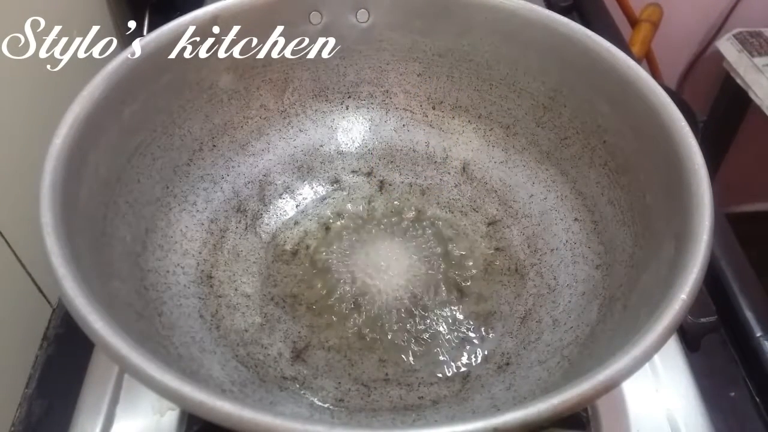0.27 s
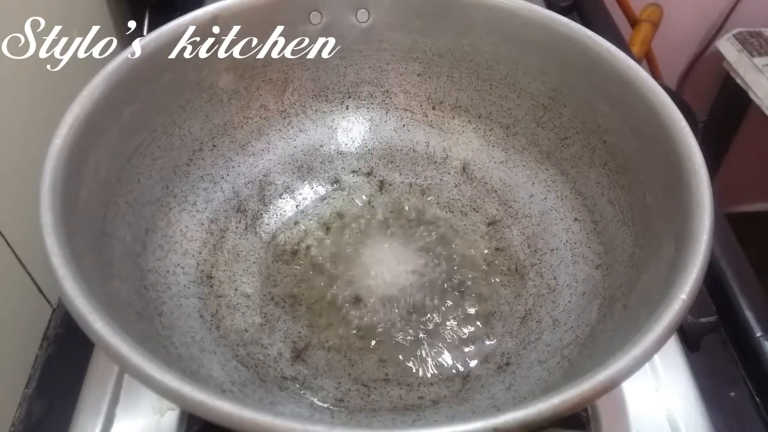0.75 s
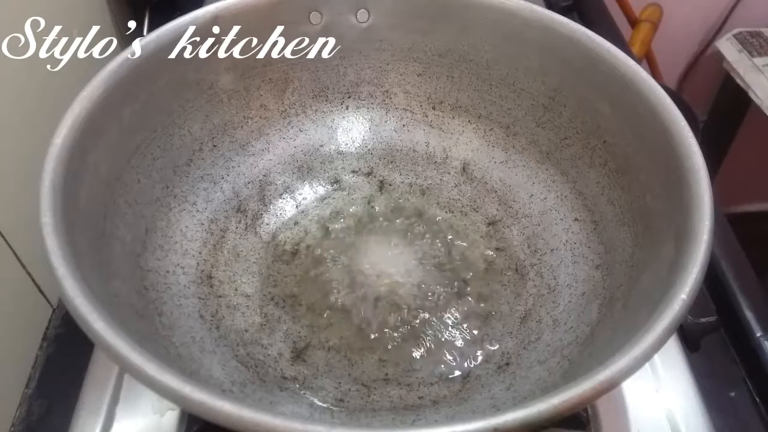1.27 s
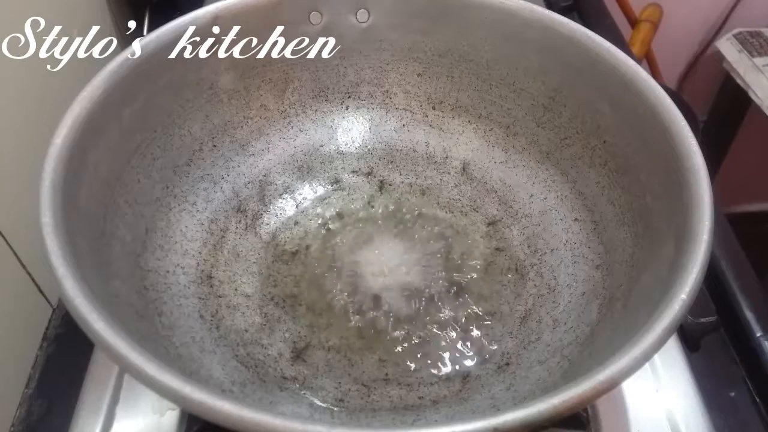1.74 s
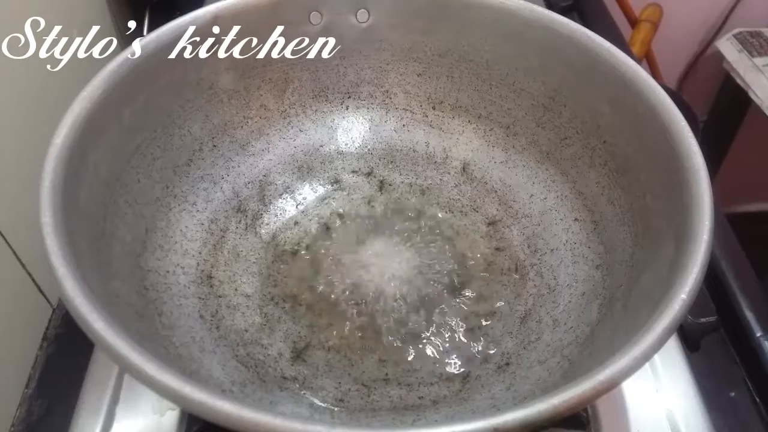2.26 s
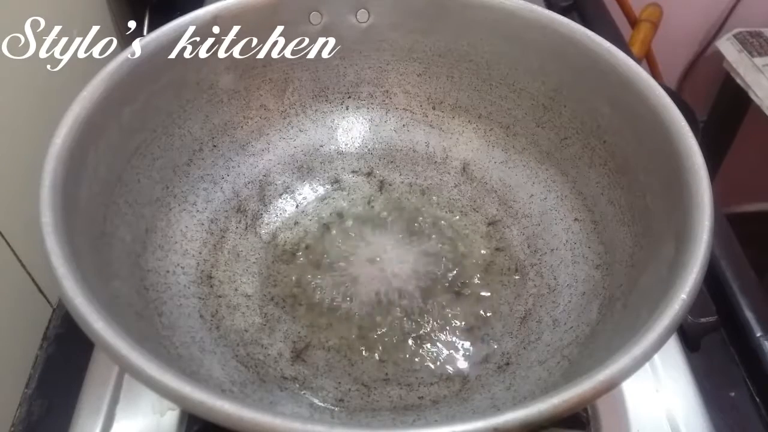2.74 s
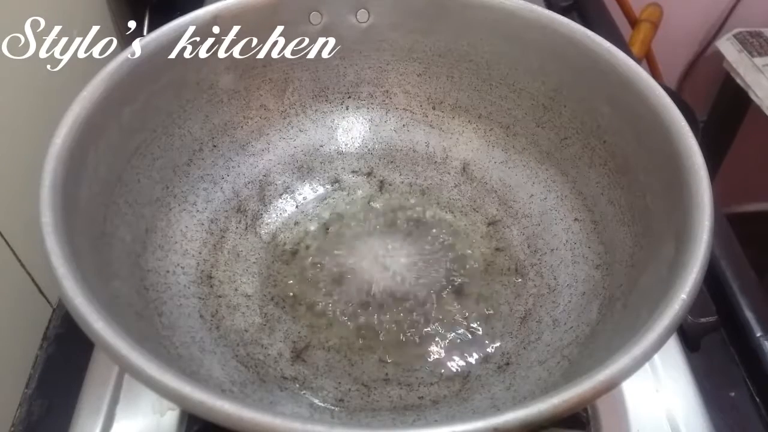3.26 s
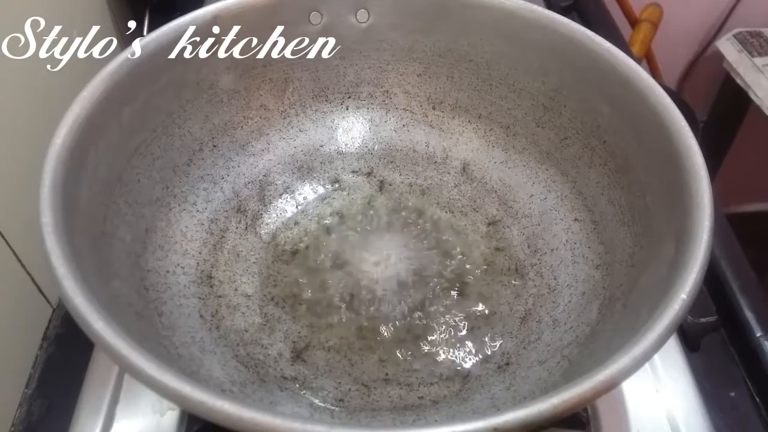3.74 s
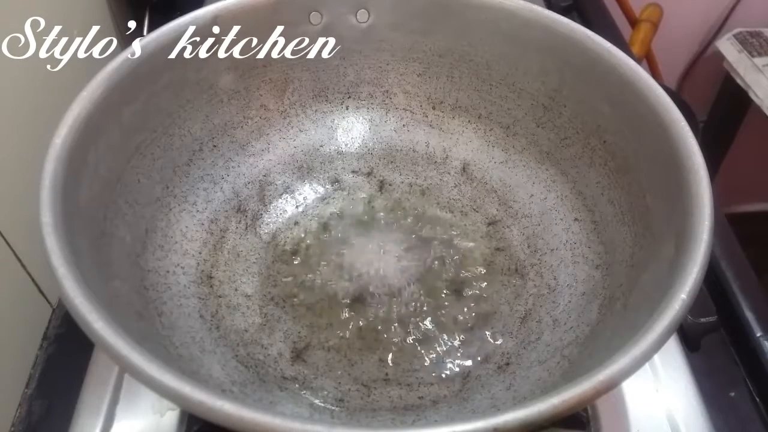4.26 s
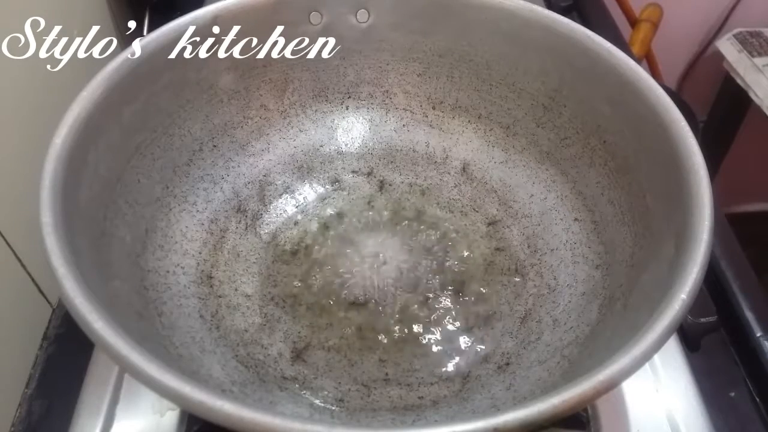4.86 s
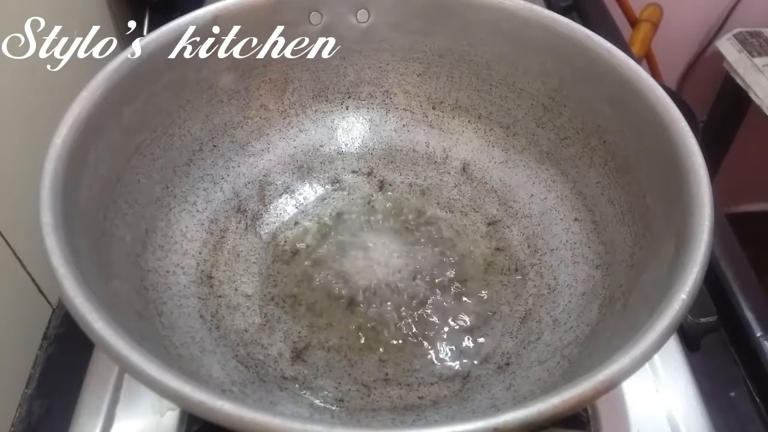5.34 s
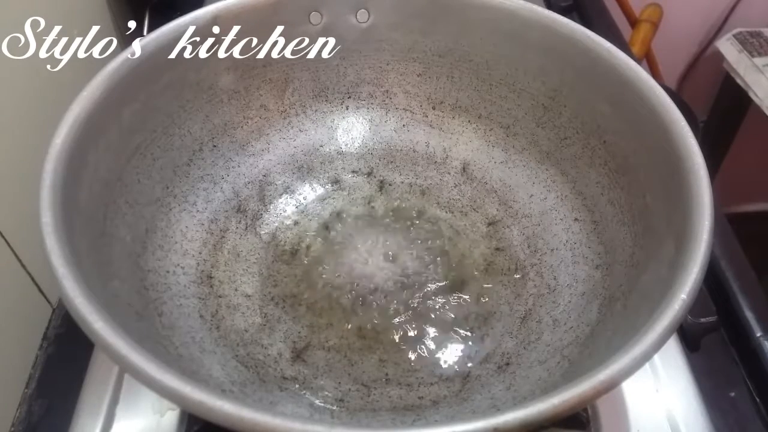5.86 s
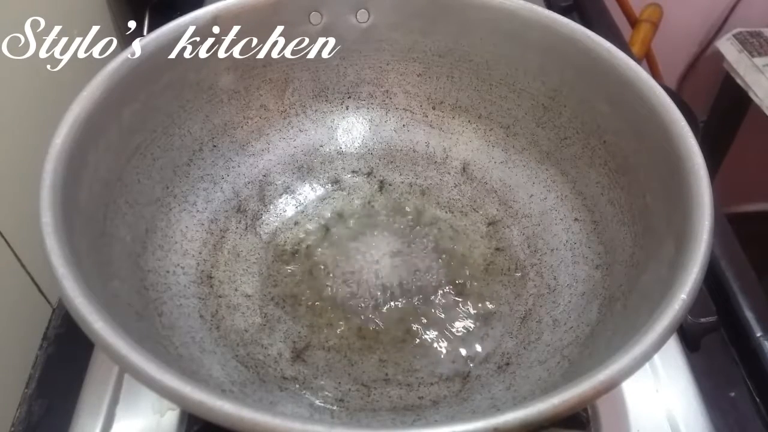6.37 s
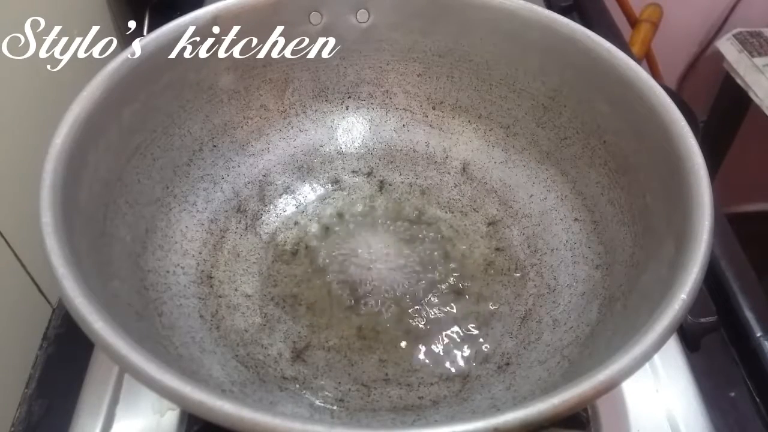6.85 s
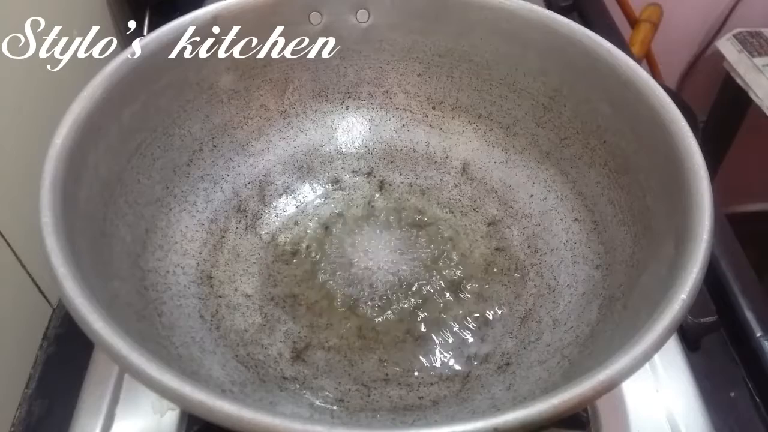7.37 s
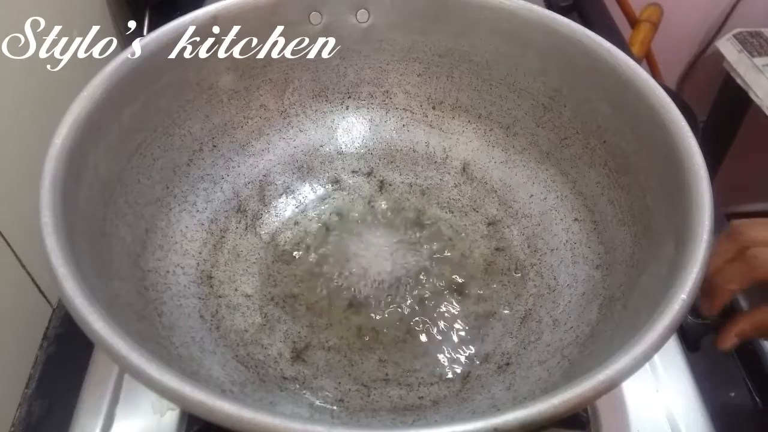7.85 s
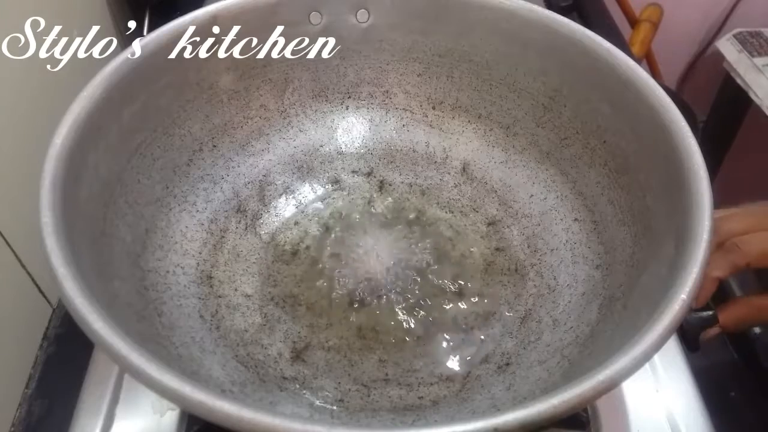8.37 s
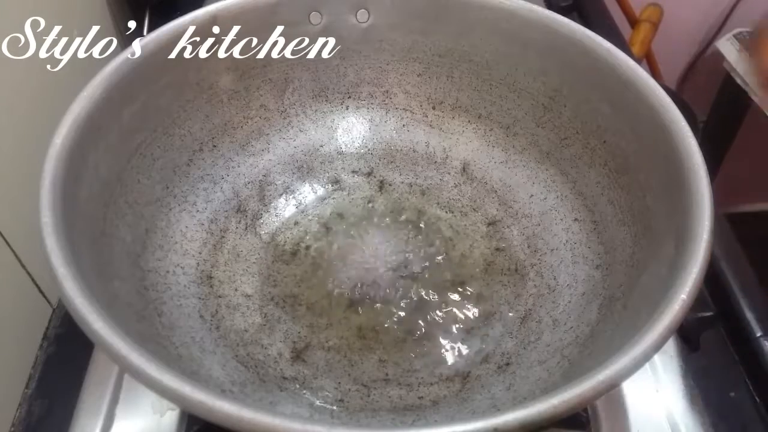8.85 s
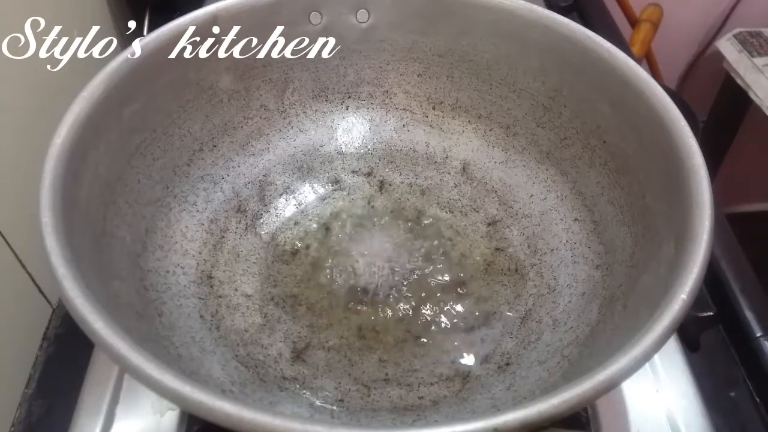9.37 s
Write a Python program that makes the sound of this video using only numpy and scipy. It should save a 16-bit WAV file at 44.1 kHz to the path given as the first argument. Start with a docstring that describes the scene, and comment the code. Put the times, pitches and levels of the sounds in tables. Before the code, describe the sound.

Close to a metal pan on a gas stove, hot oil hisses and seeds burst with sharp, snapping pops, loudest and most frequent in the first few seconds. The frying gradually dies down, with four late pops and some faint knocks. At the end only a quiet simmer and the soft rush of the flame remain in the small kitchen.

```python
"""Seeds fry in hot oil in a metal pan on a gas stove, heard close by in a small kitchen.
A seed bursts at once over the sizzle of countless tiny steam bubbles. The boil swells for 1.5 s, with
a few soft, dull knocks, and until about 4 s sharp pops rattle round the pan and ring in the room.
Then the moisture boils off and the sizzle fades; four late pops and some fainter knocks follow.
By 9 s only a faint simmer and the rush of the gas flame remain."""
import sys
import numpy as np
from scipy import signal
from scipy.fft import rfft, irfft
from scipy.io import wavfile
from scipy.ndimage import uniform_filter1d

SR = 44100
rng = np.random.default_rng(int(sys.argv[2]) if len(sys.argv) > 2 else 0)


def output_pcm(signal):
    """Save a mono or channel-first signal as 16-bit PCM at the path in sys.argv[1].

    Samples are clipped to [-1, 1] before scaling.
    """
    pcm = np.clip(np.atleast_2d(signal).T, -1, 1) * 32767
    wavfile.write(sys.argv[1], SR, np.round(pcm).astype(np.int16))


N = 423801

# Reverberation time of the kitchen: f/Hz, T60/s
KITCHEN_T60 = [(100, 0.42), (500, 0.41), (2000, 0.37), (4500, 0.36), (9000, 0.48), (16000, 0.1)]
# Resonances of the pan: f/Hz, nominal bandwidth/Hz, nominal lift/dB
PAN_MODES = [(1170, 210, 5), (1302, 18, 6.5), (1753, 27.6, 5.5), (1873, 13.4, 4.5), (2110, 30, 2),
             (2680, 61, 3), (2840, 52, -8), (3080, 47, -0.5), (3330, 22, 6.5), (3530, 27, 4.5),
             (3600, 36, 3.5), (3884, 92, 6.5), (4200, 150, 5.5), (4410, 300, 2), (4586, 60, 7),
             (5001, 40, -7.5), (5100, 57.3, 4.5), (8330, 600, 4), (12540, 1200, 3.5)]
# Spectral density of the gas flame: f/Hz, relative level/dB
FLAME_SPECTRUM = [(20, -29.5), (45, -24.5), (80, 1), (125, -8), (175, -2.5), (280, -6), (620, -12.5),
                  (1500, -14), (2700, -10), (4200, -11.5), (7500, -18.5), (16000, -23.5)]
# Dull knocks: t/s, level/dB, f/Hz, nominal width/octave, rise/s, decay/s
KNOCK_EVENTS = [(1.232, -37, 726, 0.27, 0.0019, 0.031), (1.32, -46.5, 780, 0.17, 0.004, .025),
                (1.515, -36, 646, 0.26, 0.001, 0.035), (5.211, -49, 815, 0.12, 0.032, 0.034),
                (5.232, -55.5, 1380, 0.063, 0.014, 0.053), (5.637, -48.5, 308, 0.22, 0.0027, 0.021),
                (7.95, -58.5, 320, 0.34, 0.0062, 0.06), (8.743, -57, 330, 0.48, 0.01, 0.054),
                (8.762, -58.5, 2630, 0.026, 0.012, 0.031), (8.794, -59, 410, 0.48, .008, 0.04)]
# Strength of the boil as the moisture runs out: t/s, level/dB
BOIL_LEVEL = [(0.0, -41.5), (0.72, -39.5), (0.97, -39.5), (1.12, -38.5), (1.55, -37.5), (1.9, -40),
              (2.6, -41.5), (3.3, -41), (3.85, -43.5), (4.6, -48.5), (5.4, -51), (6.35, -52.5),
              (6.85, -60.5), (7.35, -57.5), (7.75, -61.5), (8.55, -59.5), (9.0, -63), (9.6, -62.5)]
# Spectral density of the churning oil: f/Hz, relative level/dB
WASH_SPECTRUM = [(25, -3), (60, -5), (120, -0.5), (250, -3), (500, -4), (1000, -7.5), (2000, -12),
                 (4000, -16.5), (7000, -15.5), (8400, -13), (10000, -15), (12300, -12.5), (16000, -14)]
# Spectral density of the steam bubbles, before the pan's resonances: f/Hz, relative level/dB
BUBBLE_SPECTRUM = [(710, -54.5), (1200, -19), (1460, -21), (1750, -15.5), (1910, -20), (2200, -12),
                   (2830, -9), (3150, -3.5), (3430, -5.5), (4310, 1.5), (5350, -2), (7330, -18),
                   (9820, -25.5), (15200, -26.5), (16000, -13.5)]
# Basic spectral density of a pop: f/Hz, relative level/dB
POP_SPECTRUM = [(30, -16), (90, -18.5), (300, -11.5), (700, -5.5), (1200, -14), (2000, -8.5), (3000, -1.5),
                (4200, 0), (5300, -4), (7000, -19.5), (10000, -25.5), (16000, -31)]
# Bursting seeds: t/s, nominal peak level/dB, snap f/Hz, snap level re spatter/dB,
# thump lift/dB, body lift/dB, crack lift/dB, burst length/s
SEED_BURSTS = [(0.0005, -19, 4150, -3.5, -2, 5, 13.5, 0.0084),
               (0.5026, -30.5, 3070, -13, 6, -15, 22, 0.0055),
               (1.130, -33, 3280, -14, -5, 15.5, 11, 0.0043), (1.416, -8.5, 4244, 1.5, 17, 0, 4.5, 0.0032),
               (1.961, -3.5, 4280, -1, 7, -0.5, 3, 0.0035), (2.1955, -32.5, 3550, -14, 2, 8, 6.5, 0.0035),
               (2.442, -22, 4160, -11, 9, 7.5, 2, 0.0019), (2.7157, -9.5, 1815, -14, -3, 5, 8, 0.0054),
               (2.7282, -7, 4550, -5.5, 3, -9, 9, 0.002), (3.057, -30.5, 3500, -16, 2, 5.5, 13, 0.0055),
               (3.2221, -15.5, 3170, 1.5, 4, 7, -8.5, 0.0015), (3.309, -18.5, 2680, -4.5, -6, 7, 1, 0.0013),
               (3.9418, -23.5, 4200, -14, 9, 13, 9, 0.0045), (5.9695, -19, 4140, -7, 3, 1.5, 11, 0.0055),
               (6.416, -13.5, 5270, -16, 3, -5, -1.5, 0.01), (7.0931, -26, 2570, -2.5, 7, 1.5, 7, 0.0059),
               (7.466, -23, 4200, -27, 9, -4.5, 11, 0.006)]

# Each SLOPE is in dB per dB: of the boil re a full boil, or of a pop re a middling pop.
FULL_BOIL_DB = -40
FLARE_DB, FLARE_S, FLARE_GROWTH = 2.5, 0.13, 0.55  # flare after a 0 dB pop, rise time, power-law exponent
BUBBLES_PER_S, BUBBLES_SLOPE = 7300, 0.78  # in each layer of the sizzle, at a full boil
SPRAY_DB, SPRAY_SLOPE = -45, 1.13  # the finest spray needs a lively boil
WASH_DB, WASH_SLOPE = -52, 0.63  # the wash fades more slowly
SURGE_DB, SURGE_HZ = 1.5, 1  # hiss and spray each come in uneven surges
POP_DB, POP_S = -21, 0.0049  # a middling pop
FIZZ_DB, FIZZ_SLOPE, FIZZ_DB_PER_DOUBLING = 4, 0.18, -0.5  # strong, short bursts throw finer spatter
ECHO_DB, ECHO_SLOPE = -4, -0.14  # a stronger pop stands out more from the room
WALL_S, WALL_DB = 0.011, -18  # reflection from the wall behind the stove
CUTOFF_HZ = 16000


def amp(db):
    """Amplitude ratio: a factor of ten for every 20 dB."""
    return 10 ** (np.asarray(db) / 20)


def unit_rms(x):
    """Normalisation to unit mean power."""
    return x / np.sqrt(np.mean(x ** 2) + 1e-20)


def log_interp(table, hz):
    """Interpolation of a table on a logarithmic frequency axis."""
    f, value = np.transpose(table)
    return np.interp(np.log(hz + 1), np.log(f + 1), value)


def add(mix, start_s, sound):
    """Superposition: a sound adds linearly to the mix from start_s on."""
    part = mix[max(round(start_s * SR), 0):][:len(sound)]
    part += sound[:len(part)]


def bins(size=8192):
    """Uniform sampling of the spectrum: the frequencies on which filter gains are given."""
    return np.fft.rfftfreq(size, 1 / SR)


def colour(x, gain_db):
    """Minimum-phase filtering: the phase follows from the log gain by the Hilbert transform."""
    log_gain = np.log(amp(np.r_[gain_db, gain_db[-2:0:-1]]))
    response = np.exp(np.conj(signal.hilbert(log_gain)))[:len(gain_db)]
    taps = irfft(response)[:len(gain_db)]
    return signal.oaconvolve(x, taps)[:len(x)]


def hump(hz, octaves):
    """A Gaussian band of height 1 in log frequency."""
    return np.exp(-.5 * (np.log2((bins() + 1) / hz) / octaves) ** 2)


def drift(corner_hz):
    """Random modulation: low-passed noise of unit rms."""
    f = np.fft.rfftfreq(N, 1 / SR)
    spectrum = rfft(rng.standard_normal(N))
    return unit_rms(irfft(spectrum / (1 + (f / corner_hz) ** 2), N))


def impulses(count, per_s):
    """A Poisson process over count samples: impulses of random sign at random moments."""
    return rng.choice([-1., 1.], count) * (rng.random(count) < per_s / SR)


def room_tail(gap_s=.009, early_gain=0.51, early_s=0.013):
    """Reverberation of unit energy: strong echoes from stove and wall, then decay band by band."""
    t = np.arange(SR // 2) / SR
    echoes = impulses(len(t), per_s=5000) * (t > gap_s) * (1 + early_gain * np.exp(-t / early_s))
    hz, age, spectra = signal.stft(echoes, SR, nperseg=256)
    decay = amp(-60 * age / log_interp(KITCHEN_T60, hz)[:, None])
    tail = signal.istft(spectra * decay, SR, nperseg=256)[1][:len(t)]
    return tail / np.linalg.norm(tail)


def pan_resonance(coupling=0.85, damping=0.89):
    """Modal response in dB: each Lorentzian peak or dip scales with coupling and widens with damping."""
    hz, width, lift_db = np.transpose(PAN_MODES)
    detuning = 2 * (bins()[:, None] - hz) / (width * damping)
    return (coupling * lift_db / (1 + detuning ** 2)).sum(1)


def gas_flame():
    """Broadband noise, slightly modulated: the rush of the flame and the last faint simmer."""
    rush = unit_rms(colour(rng.standard_normal(N), log_interp(FLAME_SPECTRUM, bins())))
    return amp(-62.5) * rush * amp(1.2 * drift(corner_hz=5))


def knocks():
    """Damped resonance: each soft blow swells in one band, then decays exponentially."""
    out, t = np.zeros(N), np.arange(SR // 2) / SR
    for start_s, db, hz, width, rise, decay in KNOCK_EVENTS:
        band_db = 50 * (hump(hz, 3 * width) - 1)
        ring = unit_rms(colour(impulses(len(t), per_s=6000), band_db))
        swell = np.minimum(t / rise, 1) * np.exp(-np.maximum(t - rise, 0) / decay)
        add(out, start_s, amp(db) * ring * swell)
    return out


def boil_level():
    """Evaporation: the boil, in dB, sinks as the moisture goes and flares when a seed spills more."""
    t = np.arange(N) / SR
    level_db = np.interp(t, *np.transpose(BOIL_LEVEL))
    for start_s, peak_db, *_ in SEED_BURSTS:
        age = np.maximum(t - start_s, 0) / FLARE_S
        level_db += FLARE_DB * amp(FLARE_GROWTH * peak_db) * age * np.exp(1 - age)
    return level_db


def bubbles(per_s, spread_db=2.5, patches=8):
    """Shot noise of even mean power: most bursts are weak, and each patch of oil has its own echoes."""
    clicks = impulses(N, per_s)
    strength = amp(spread_db * np.minimum(rng.exponential(1, N), 5))
    clicks = clicks * strength / np.sqrt(per_s)
    patch = rng.integers(0, patches, N)
    echoes = sum(signal.oaconvolve(clicks * (patch == k), room_tail())[:N] for k in range(patches))
    return unit_rms(clicks + amp(3.4) * echoes)


def sizzle(boil_db, crossover_hz=5100):
    """Bubble resonance: smaller bubbles ring higher, so a fine spray lies above the hiss and oil wash."""
    strength_db = boil_db - FULL_BOIL_DB
    rate = BUBBLES_PER_S * amp(BUBBLES_SLOPE * strength_db)
    shape_db = log_interp(BUBBLE_SPECTRUM, bins()) + pan_resonance()
    fineness = ((bins() + 1) / crossover_hz) ** 10
    hiss = unit_rms(colour(bubbles(rate), shape_db - 10 * np.log10(1 + fineness)))
    spray = unit_rms(colour(bubbles(rate), shape_db - 10 * np.log10(1 + 1 / (fineness + 1e-4))))
    wash = unit_rms(colour(bubbles(rate), log_interp(WASH_SPECTRUM, bins())))
    hiss_db = boil_db + 0.43 + SURGE_DB * drift(SURGE_HZ)
    spray_db = SPRAY_DB + SPRAY_SLOPE * strength_db + SURGE_DB * drift(SURGE_HZ)
    wash_db = WASH_DB + WASH_SLOPE * strength_db
    flutter = amp(0.92 * drift(corner_hz=27))
    return flutter * (hiss * amp(hiss_db) + spray * amp(spray_db) + wash * amp(wash_db))


def droplet_ticks(boil_db, per_s=4):
    """Random transients: droplets in the oil make faint pops whose level follows the boil."""
    out = np.zeros(N)
    for when, faintness, pitch in rng.random((int(per_s * N / SR), 3)):
        at = int(when * N)
        peak_db = -37.0 + 0.61 * (boil_db[at] - FULL_BOIL_DB) - 8 * faintness
        tick = pop(peak_db, snap_hz=1500 + 3000 * pitch, snap_db=-1.6,
                   thump_db=0, body_db=10.0, crack_db=3.7, length_s=0.0041)
        add(out, at / SR, tick)
    return out


def hull_snap(t, hz, length_s, glide=0.57):
    """Flow-driven tone: steam forced through the split hull wavers and falls as the crack opens."""
    waver = 0.087 * unit_rms(uniform_filter1d(rng.standard_normal(len(t)), size=40))
    cycles = np.cumsum(hz * (1 + waver + glide * np.exp(-t / 0.00044))) / SR
    tone = np.sin(2 * np.pi * cycles) + amp(-38.5) * np.sin(4 * np.pi * cycles)
    attack = 1 - np.exp(-t / 0.000088)
    return tone * attack * np.exp(-(t / length_s) ** 0.89)


def pop(peak_db, snap_hz, snap_db, thump_db, body_db, crack_db, length_s):
    """Impulsive excitation: a pitched snap and a spatter of oil rebounding in the pan excite the room."""
    force_db = peak_db - POP_DB
    fizz_db = FIZZ_DB + FIZZ_SLOPE * force_db + FIZZ_DB_PER_DOUBLING * np.log2(length_s / POP_S)
    tail = amp(ECHO_DB + ECHO_SLOPE * force_db) * room_tail()
    t = np.arange(len(tail)) / SR
    attack = 1 - 0.36 * np.exp(-t / (0.75 * length_s))
    burst = impulses(len(t), per_s=20000) * attack * np.exp(-(t / length_s) ** 1.4)
    # The place of the burst decides which modes ring; a longer burst drives them harder.
    coupling = rng.uniform(0.32, 1.35, len(PAN_MODES)) * np.clip(length_s / POP_S, .7, 1.8)
    shape_db = log_interp(POP_SPECTRUM, bins()) + pan_resonance(coupling, damping=0.94)
    shape_db += thump_db * hump(58, 1.0) + body_db * hump(920, 0.85)
    shape_db += crack_db * hump(1700, 0.57) + fizz_db * hump(9500, 1.0)
    spatter = colour(burst / np.linalg.norm(burst) + tail, shape_db)
    snap = hull_snap(t, snap_hz, min(1.7 * length_s, .0075))
    snap += amp(-3.0) * signal.oaconvolve(snap, tail)[:len(t)]
    sound = spatter + amp(snap_db) * unit_rms(snap) * spatter.std()
    add(sound, WALL_S, amp(WALL_DB) * sound)
    return amp(peak_db + 22.0) * sound


def seed_pops():
    """Sudden pressure release: each seed splits with one pop."""
    out = np.zeros(N)
    for start_s, *burst in SEED_BURSTS:
        add(out, start_s, pop(*burst))
    return out


def scene():
    """Superposition of sources straight ahead, which reach both channels alike."""
    boil_db = boil_level()
    mono = sizzle(boil_db) + seed_pops() + droplet_ticks(boil_db) + knocks() + gas_flame()
    return np.array([mono, mono])


def record(dry):
    """Soft saturation rounds off the loudest pops; a low-pass filter then limits the band."""
    rounded = 1.1 * np.tanh(dry / 1.1)
    low_pass = signal.firwin(511, CUTOFF_HZ, window=("kaiser", 9), fs=SR)
    return signal.oaconvolve(rounded, low_pass[None], "same")


dry = scene()
out = record(dry)
output_pcm(out)
```